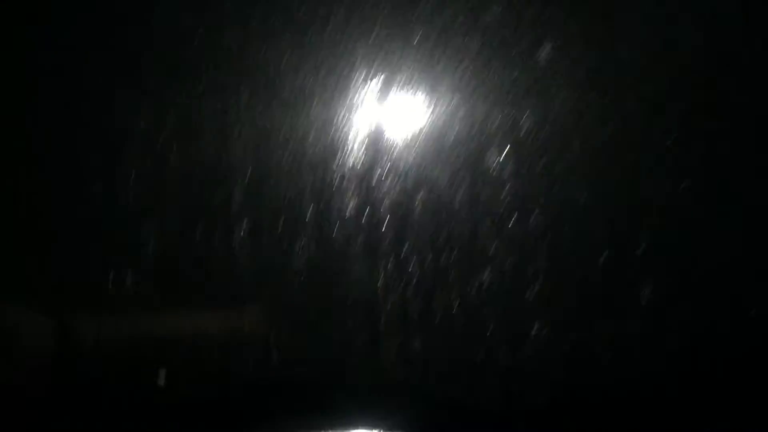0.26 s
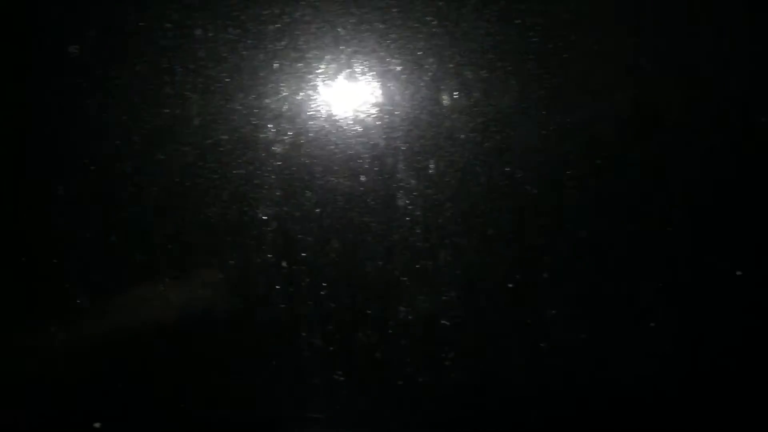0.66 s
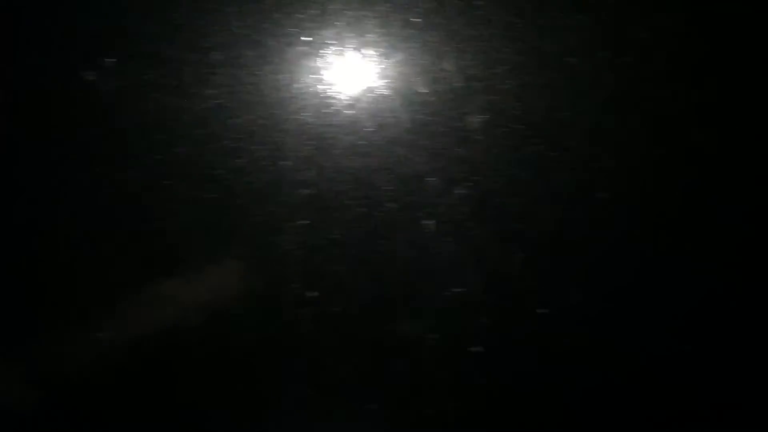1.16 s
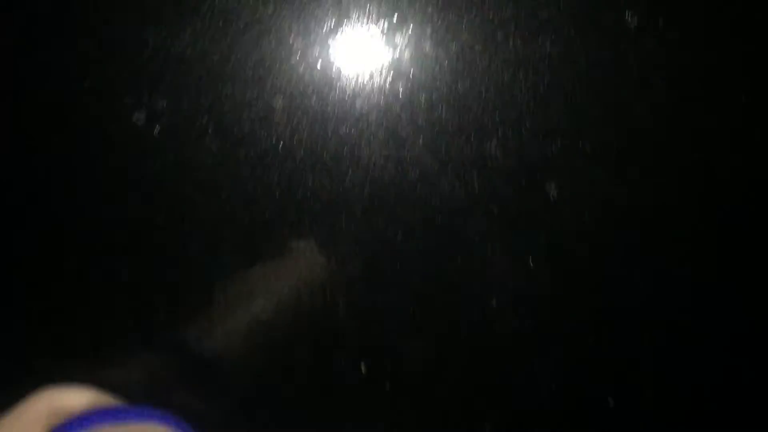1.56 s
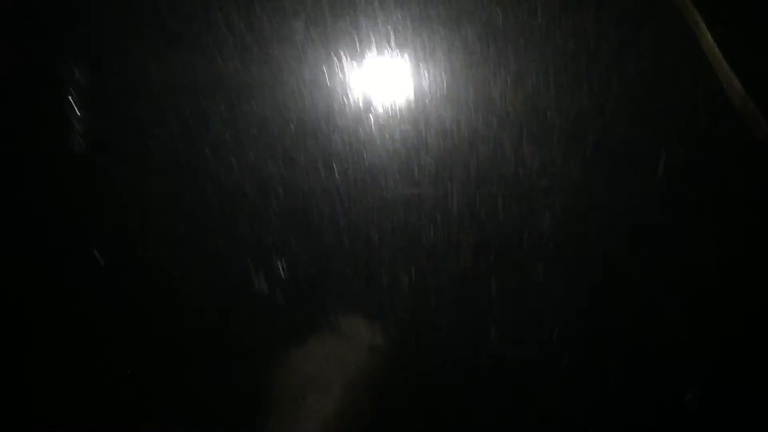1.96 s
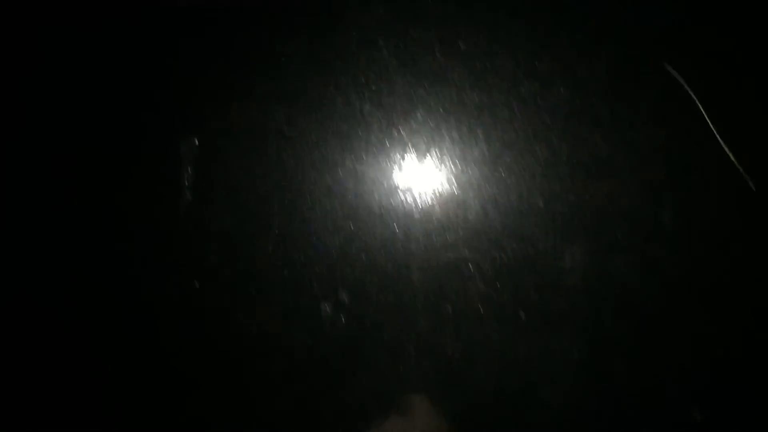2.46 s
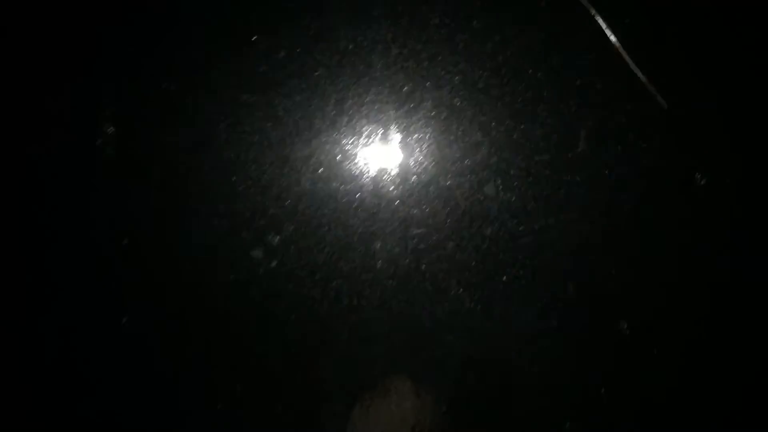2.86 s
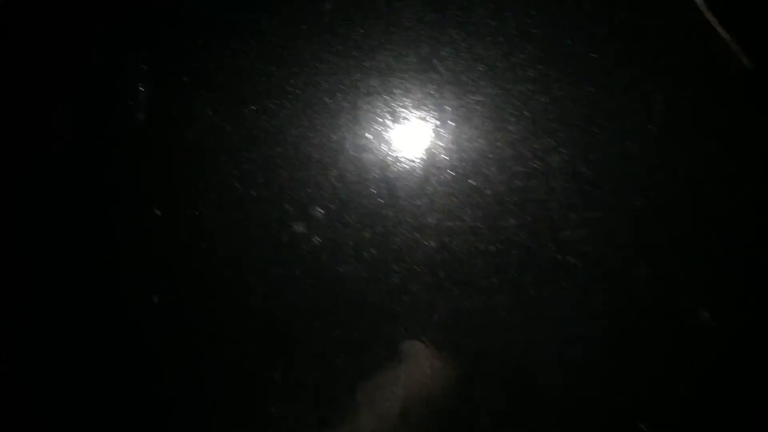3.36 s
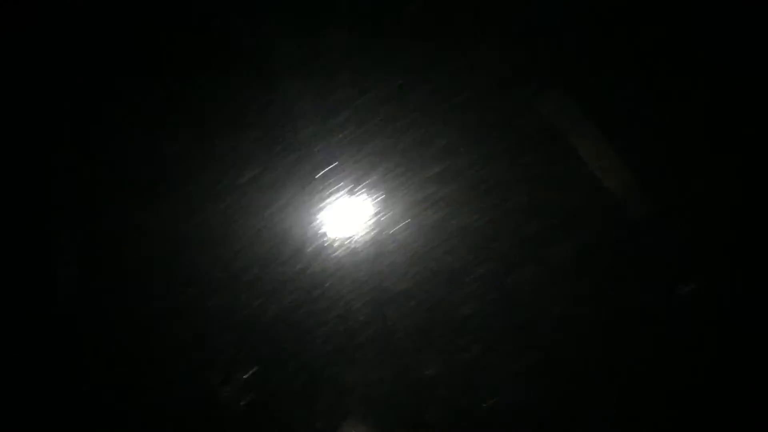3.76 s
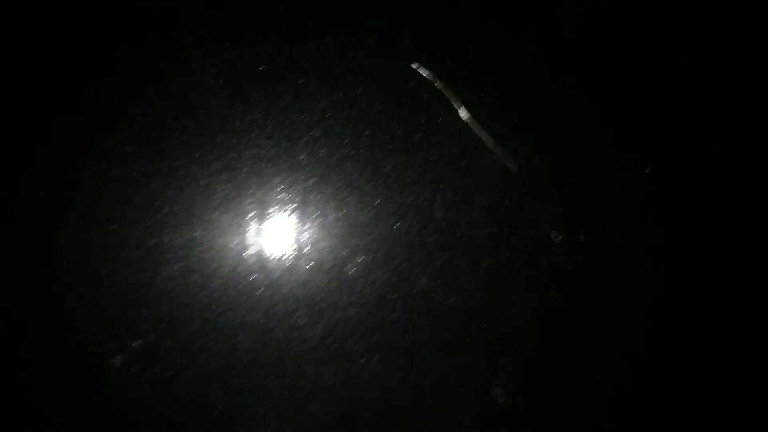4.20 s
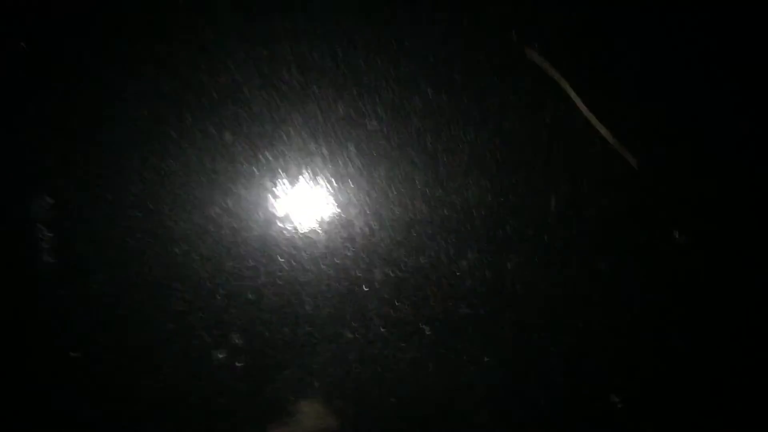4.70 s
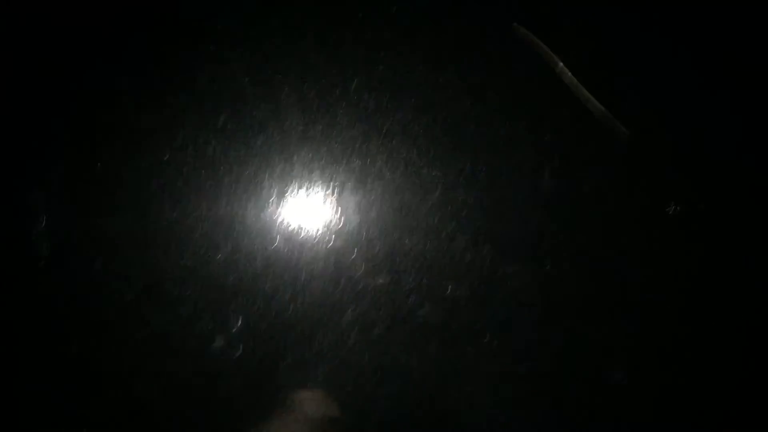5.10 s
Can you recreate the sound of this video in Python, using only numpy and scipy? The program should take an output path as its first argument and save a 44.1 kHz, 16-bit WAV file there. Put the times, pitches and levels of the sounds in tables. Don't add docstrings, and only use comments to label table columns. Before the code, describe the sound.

Heavy boots crunch in packed snow at night, close to the microphone, with one hard hollow knock on gear and small metallic ticks.

```python
import sys
import numpy as np
from scipy import signal
from scipy.fft import rfft, irfft, next_fast_len
from scipy.io import wavfile
from scipy.ndimage import uniform_filter1d, map_coordinates

SR = 44100
rng = np.random.default_rng(int(sys.argv[2]) if len(sys.argv) > 2 else 0)


def rack_gain(trim_db):
    fader = np.asarray(trim_db, float)
    return 10 ** (fader / 20)


def master(y):
    cut = np.clip(np.atleast_2d(y).T, -1, 1)
    pcm = np.round(cut * 32767)
    wavfile.write(sys.argv[1], SR, pcm.astype(np.int16))


N = 235561

# pitch in Hz, level in dB.
AIR_COLOUR = [(15, -65), (25, -28), (76, -3.5), (213, -8.5), (398, -14.5), (973, -13), (2730, -23.5),
              (16300, -35.5)]
# start in seconds, level in dB.
RING_STARTS = [(0.0697, -51.5), (0.566, -61), (0.7248, -61), (2.3675, -42), (2.3814, -56), (2.5713, -31.5),
               (2.7187, -55.5), (3.8774, -65), (4.376, -55), (4.6977, -61), (5.027, -57), (5.0459, -44),
               (5.0674, -51), (5.1622, -63)]
# start in seconds, level
# in dB, pitch in Hz, time to fall 60 dB in seconds.
PINGS = [(.557, -41, 1230, .045), (.618, -51, 2500, .028), (1.029, -57.5, 1865, .28),
         (1.131, -46, 1440, .04), (1.132, -48, 810, .06), (1.637, -45.5, 3060, .027),
         (1.64, -54, 3500, .022), (1.79, -52, 494, .059), (2.617, -58, 8800, .041),
         (3.098, -49, 5540, .04), (3.099, -48, 4250, .045), (3.234, -36.5, 1980, .03),
         (4.07, -65.5, 5700, .085), (4.211, -58, 5400, .03), (4.536, -50, 2860, .02),
         (4.62, -54, 5600, .044), (4.621, -52, 3700, .03), (4.672, -65.5, 5860, .22),
         (4.757, -68, 5860, .06), (4.869, -68, 5860, .37), (5.001, -50.5, 4150, .04),
         (5.002, -58, 6200, .036), (5.07, -63, 8570, .07)]
# pitch in Hz, level in dB.
RAP_COLOUR = [(240, -62.5), (400, -10.5), (779, -18), (1110, -1), (2070, -24), (2460, -20), (3000, -27),
              (16300, -39.5)]
# pitch in Hz, width in Hz, level in dB.
SHELL_RING = [(725, 19, 2.5), (940, 260, 3), (1250, 220, 2.5), (1684, 310, -6), (2600, 110, -7),
              (3760, 770, -19), (6100, 2100, -33.5)]
# start in seconds, click level in dB, bright part in dB above the click.
FITTING_TICKS = [(0.0702, -45, -27), (0.18, -64, -1), (0.5637, -37.5, -34), (0.722, -46, -34),
                 (1.365, -58, -24), (1.5334, -49.5, -30.5), (2.234, -55.5, -5.5), (2.3131, -59, 7.5),
                 (2.3303, -39, -23), (2.3652, -47.5, -1), (2.3803, -34, -19), (2.5674, -48, 5),
                 (2.5713, -35, -7), (2.5761, -43, -7), (2.6162, -40, -9), (2.9727, -56, -21.5),
                 (3.2512, -43, -13.5), (3.8676, -35.5, -5), (3.8784, -51.5, -2.5), (4.0409, -50.5, -8.5),
                 (4.0705, -39.5, -2.5), (4.214, -44.5, -29.5), (4.263, -49.5, -16), (4.6595, -40.5, -8),
                 (4.756, -54, -10), (4.8664, -33, -33.5), (4.9331, -36.5, -3.5), (5.045, -47, -23),
                 (5.0669, -44, -12), (5.1764, -43, -2)]
# start in seconds, end in seconds, level in dB.
FITTING_CHATTER = [
    (2.227, 2.344, -68.5),
    (2.356, 2.41, -60),
    (2.527, 2.636, -60.5),
    (3.847, 3.866, -47.5),
    (4.051, 4.084, -54),
    (4.63, 4.701, -57),
    (4.81, 4.935, -56.5),
    (5.153, 5.197, -50),
    (5.219, 5.223, -38.5),
]
# pitch in Hz, width in Hz, level in dB.
DULL_CLICK = [(2870, 1350, -13), (4450, 540, -7.5), (5500, 380, -1.5), (6940, 1000, -8), (8770, 220, -5.5)]
# pitch in Hz, width in Hz, level in dB.
BRIGHT_CLICK = [(12250, 1600, 4.5), (13300, 1400, -5), (15200, 1500, -13)]
# start in seconds, snap level in dB, grit and fizz in dB above the snap.
CRUST_BREAKS = [(0.557, -46, -36, -27), (1.13, -52, -41.5, -39), (1.635, -44, -23.5, -23.5),
                (2.07, -12, -10.5, -26.5), (2.084, -14, -23.5, -45), (2.097, -18, -21.5, -44),
                (2.113, -24.5, -11.5, -27), (2.149, -39.5, -7, -20), (3.096, -30.5, -28.5, -36),
                (3.114, -33.5, -11, -25), (3.148, -36, -18, -29), (3.171, -26, -12, -23),
                (3.185, -32.5, -25, -44), (3.233, -30.5, -23, -50), (3.568, -17, -15, -26),
                (3.578, -17, -22, -32), (3.589, -14.5, -13, -24), (3.602, -16.5, -15, -32),
                (3.62, -21.5, -18, -37), (3.634, -25.5, -10, -27), (3.681, -49, -3.5, -10),
                (4.617, -30, -27.5, -37), (4.663, -40.5, -20, -20), (4.949, -34.5, -26.5, -39.5),
                (4.978, -32, -29, -43), (5.019, -41, -29, -37), (5.032, -36, -14, -33),
                (5.233, -23, -7.5, -19.5), (5.243, -23.5, -28, -43), (5.292, -38.5, -9, -34)]
# start in seconds, snap level in dB.
CRUST_NICKS = [(2.079, -20), (2.105, -34), (2.126, -41), (2.137, -49), (2.165, -37), (2.185, -48),
               (3.131, -31), (3.261, -67), (4.639, -50), (4.998, -45), (5.045, -42), (5.065, -56),
               (5.19, -44.5), (5.205, -48), (5.226, -36), (5.259, -28.5), (5.321, -40.5)]
# pitch in Hz, width in Hz, level in dB.
CRUST_BODY = [(671, 150, 2), (994, 146, 0.5), (1136, 67, -2), (1572, 200, -5), (2090, 250, -10),
              (2530, 700, -15)]
# pitch in Hz, level in dB.
GRIT_COLOUR = [(1760, -27), (3000, -1), (4880, -14.5), (6180, -15), (7000, -29.5), (9100, -43),
               (15400, -120)]
# pitch in Hz, level in dB.
FIZZ_COLOUR = [(4120, -32.5), (7000, -5.5), (10600, -10), (14300, -15.5), (16300, -23.5)]
# start in seconds, thud level in dB, time the weight is held in seconds,
# boot bounce and ground push in dB above the thud.
STEPS = [(0.555, -38, 0.0047, -1.5, -1.5), (0.961, -46, 0.054, -2.5, -5.5), (1.131, -50, 0.01, 0.5, -11.5),
         (1.636, -41, 0.002, -6.5, -25), (2.07, -9.5, 0.005, -4, -4), (3.097, -17.5, 0.083, -5.5, -12.5),
         (3.57, -13.5, 0.048, -5, -8), (4.619, -32, 0.033, -6, 4.5), (4.949, -33, 0.047, 8, -8),
         (4.995, -25.5, 0.044, 2, -10), (5.232, -21.5, 0.017, 3.5, -0.5), (5.325, -53, .02, 20, 3)]
# middle in seconds, length in seconds, thud level in dB,
# boot bounce and ground push in dB above the thud.
WEIGHT_SHIFTS = [(.685, 0.075, -52.5, -3.5, -4), (0.759, 0.12, -55, 2, -6), (.945, .04, -59, -3, 7),
                 (1.11, .06, -57, -5, -12), (1.62, 0.035, -59, 2, -2.5), (2.328, 0.097, -49, -20, -8),
                 (2.472, 0.2, -51, -10, -7), (3.399, 0.15, -72.5, 0.5, 8.5), (3.858, 0.29, -61, -0.5, 7.5),
                 (3.993, 0.091, -53.5, -5.5, 1), (4.27, 0.1, -63.5, -12, -22.5),
                 (4.78, .14, -66.5, -6.5, 12), (4.911, 0.11, -51.5, 1, 5.5), (5.171, 0.053, -52, -4, 1),
                 (5.215, 0.058, -38.5, -8, 8)]
# pitch in Hz, width in Hz, level in dB.
SNOW_HOLLOW = [(313.4, 44, 7.5), (439.6, 74, -1.5), (435.8, 31, 1), (555, 77, -14)]
# pitch in Hz, width in Hz, level in dB.
BOOT_BOUNCE = [(183.2, 47, 3.5), (235.5, 95, -1)]
# pitch in Hz, width in Hz, level in dB.
GROUND_PUSH = [(68.3, 29, -3), (100, 33, -1.5)]


def unit(x):
    return x / np.sqrt(np.mean(x ** 2) + 1e-20)


def filtered(x, response):
    m = next_fast_len(N + SR // 2)
    return irfft(rfft(x, m) * response(np.fft.rfftfreq(m, 1 / SR)), m)[:N]


def colour(points):
    points_hz, db = np.transpose(points)
    return lambda f: rack_gain(np.interp(np.log(f + 1), np.log(points_hz), db))


def hollow(modes):
    def response(f):
        total = 0
        for k, (hz, width, db) in enumerate(modes):
            push = 1j * f * width
            total = total + (-1) ** k * rack_gain(db) * push / (hz * hz - f * f + push)
        return total
    return response


def grains(per_s, spread_db, bed):
    snap = rng.random(N) < per_s / SR
    size = rng.standard_normal(N) * rack_gain(spread_db * np.minimum(rng.exponential(size=N), 3))
    return unit(snap * size) + bed * rng.standard_normal(N)


def driven(drive, level, response):
    gain = np.sqrt(np.mean(np.abs(response(np.linspace(0, SR / 2, 20000))) ** 2))
    return filtered(level * drive, response) / (gain * np.std(drive))


def night_air():
    swell_db = 0.8 * map_coordinates(rng.standard_normal(40), [np.arange(N) * 3 / SR])
    return rack_gain(-66 + swell_db) * unit(filtered(rng.standard_normal(N), colour(AIR_COLOUR)))


def ring(modes, t, attack):
    sines = sum(rack_gain(db - 60 * t / t60) * np.sin(2 * np.pi * hz * t) for hz, db, t60 in modes)
    return sines * (1 - np.exp(-t / attack))


def rings():
    t, out = np.arange(SR // 4) / SR, np.zeros(N + SR)
    for s, db in RING_STARTS:
        partials = [(14160, db, 0.047), (13140, db - 20, 0.035)]
        out[round(s * SR):][:len(t)] += ring(partials, t, attack=0.0005)
    for s, db, hz, t60 in PINGS:
        out[round(s * SR):][:len(t)] += ring([(hz, db, t60)], t, attack=0.00071)
    return out[:N]


def knock():
    t = np.maximum(np.arange(N) / SR - 0.961, 0)
    rise = (1 - np.exp(-t / 0.00276)) ** 3
    fall = rack_gain(-60 * t / 0.022) + rack_gain(-17 - 60 * t / 0.07)
    blow = driven(rng.standard_normal(N), rise * fall * rack_gain(-2.0), colour(RAP_COLOUR))
    shell = driven(rng.standard_normal(N), rise * rack_gain(-31.5 - 60 * t / 0.2), hollow(SHELL_RING))
    return blow + shell


def fitting():
    t, dull, bright = np.arange(900) / SR, np.zeros(N + SR), np.zeros(N + SR)
    fall = rack_gain(7.0 - 60 * t / 0.0058) + rack_gain(-8.0 - 60 * t / 0.048)
    scrapes = rng.standard_normal((len(FITTING_TICKS), 2, 900))
    for (s, db, bright_db), scrape in zip(FITTING_TICKS, scrapes):
        dull[round(s * SR):][:900] += rack_gain(db) * fall * scrape[0]
        bright[round(s * SR):][:900] += rack_gain(db + bright_db) * fall * scrape[1]
    shake = grains(per_s=330, spread_db=-1.0, bed=1.0)
    for start, end, db in FITTING_CHATTER:
        a, b = round(start * SR), round(end * SR)
        rattle = np.hanning(b - a) * shake[a:b]
        dull[a:b] += rack_gain(db) * rattle
        bright[a:b] += rack_gain(db - 11) * rattle
    return filtered(dull[:N], hollow(DULL_CLICK)) + filtered(bright[:N], hollow(BRIGHT_CLICK))


def crunch(load):
    crumble_db, crumble_t60 = -8.5, 0.17
    nick_grit_db, nick_fizz_db = -21.5, -26
    grind_db = np.array([[-21.5], [-41], [-56]])
    grind_grows = 1.2
    lumps_per_s, lumpy_db = 160, 2.5

    t, power = np.arange(SR // 2) / SR, np.zeros((3, N + SR))
    snap = rack_gain(-60 * t / 0.045 - np.array([[0], [3], [6]]))
    crumble = rack_gain(crumble_db - 60 * t / crumble_t60 * np.array([[1], [1.15], [1.3]]))
    rise = (1 - np.exp(-t / 0.0004)) ** 2
    shape = (snap ** 2 + crumble ** 2) * rise
    nicks = [(s, db, nick_grit_db, nick_fizz_db) for s, db in CRUST_NICKS]
    for s, db, grit_db, fizz_db in list(CRUST_BREAKS) + nicks:
        strength = rack_gain(db + np.array([[0], [grit_db], [fizz_db]]))
        power[:, round(s * SR):][:, :len(t)] += strength ** 2 * shape
    power[:, :N] += (rack_gain(grind_db) * load * (10 * load) ** (grind_grows - 1)) ** 2

    knots = rng.standard_normal((3, int(N / SR * lumps_per_s) + 4))
    place = np.arange(N) * lumps_per_s / SR
    power[:, :N] *= rack_gain([2 * lumpy_db * map_coordinates(k, [place], order=1) for k in knots])

    coarse = grains(per_s=700, spread_db=-1, bed=1.0)
    fine = grains(per_s=2500, spread_db=2, bed=0.9)
    first_crack = np.round(np.transpose(CRUST_BREAKS)[0] * SR).astype(int) + 50
    coarse[first_crack] += 8
    crust = hollow(CRUST_BODY)
    dull_crust = lambda f: crust(f) / (1 + (f / 3100) ** 8)
    level = np.sqrt(power[:, :N])
    grit = driven(fine, level[1], colour(GRIT_COLOUR))
    fizz = driven(fine, level[2], colour(FIZZ_COLOUR))
    return driven(coarse, level[0], dull_crust) + grit + fizz


def footfall(t, hold, db):
    after = np.clip(t - hold, 0, None)
    blow_db = -0.5 * np.exp(-np.abs(t) / 0.0087)
    release_db_per_s = 200.5 - 2.9 * db
    down = rack_gain(blow_db - release_db_per_s * after) + rack_gain(-36 - 94.5 * after)
    brush = (t > -0.025) * rack_gain(-31.5 + 499 * np.minimum(t, 0))
    brush = brush * rack_gain([[0], [0], [13]])
    return np.where(t >= 0, down, brush)


def weight():
    lead = SR // 10
    t, level = np.arange(-lead, SR) / SR, np.zeros((3, N + 2 * SR))
    for s, db, hold, boot_db, push_db in STEPS:
        strength = rack_gain(db + np.array([[0], [boot_db], [push_db]]))
        level[:, round(s * SR) - lead:][:, :len(t)] += strength * footfall(t, hold, db)
    for s, length, db, boot_db, push_db in WEIGHT_SHIFTS:
        strength = rack_gain(db + np.array([[0], [boot_db], [push_db]]))
        swell = np.sin(np.linspace(0, np.pi, round(length * SR)))
        level[:, round((s - length / 2) * SR):][:, :len(swell)] += strength * swell
    return level[:, :N]


def steadied(drive, response, grip):
    ringing = uniform_filter1d(np.abs(filtered(drive, response)), size=900)
    return unit(drive * (np.roll(ringing, -200) / np.mean(ringing) + 0.2) ** -grip)


def thuds(level):
    pack, sole, deep = hollow(SNOW_HOLLOW), hollow(BOOT_BOUNCE), hollow(GROUND_PUSH)
    muffled = lambda f: pack(f) * 1j * f / (250 + 1j * f) / (1 + 1j * f / 700) ** 2
    bounce = lambda f: sole(f) * 1j * f / (150 + 1j * f) / (1 + 1j * f / 300) ** 2
    firm = lambda f: deep(f) * (1j * f / (50 + 1j * f) / (1 + 1j * f / 160)) ** 2
    lumps = grains(per_s=500, spread_db=-0.5, bed=0.51)
    pressed = steadied(lumps, muffled, grip=1.0)
    heel_lands = [round(row[0] * SR) + 20 for row in STEPS]
    pressed[heel_lands] -= 18
    thud = driven(pressed, level[0], muffled)
    boot = driven(steadied(lumps, bounce, grip=0.32), level[1] * rack_gain(0.5), bounce)
    ground = driven(rng.standard_normal(N), level[2], firm)
    return thud + boot + ground


def scene():
    level = weight()
    gear = rings() + knock() + fitting()
    boots = crunch(level[0]) + thuds(level)
    return (night_air() + gear + boots)[None]


def low_pass(x):
    return signal.sosfilt(signal.butter(12, 16480, fs=SR, output="sos"), x)


def record(dry):
    band = lambda f: (1j * f / (30 + 1j * f)) ** 2 / (1 + (f / 15900) ** 60)
    heard = filtered(dry[0], band)[None]
    soft = heard / (1 + np.abs(heard / 0.95) ** 4) ** (1 / 4)
    return low_pass(soft)


dry = scene()
out = record(dry)
master(out)
```